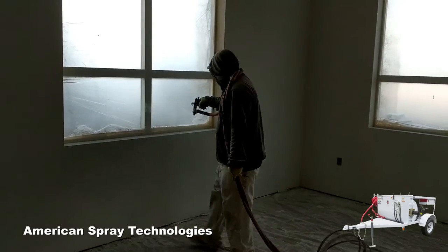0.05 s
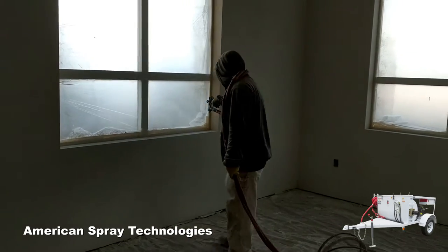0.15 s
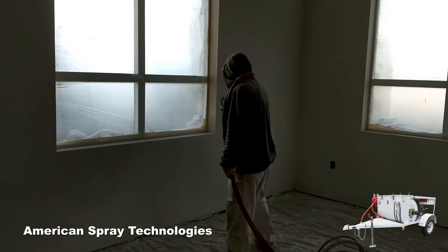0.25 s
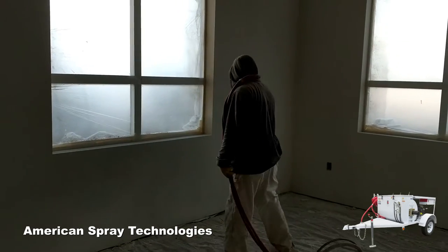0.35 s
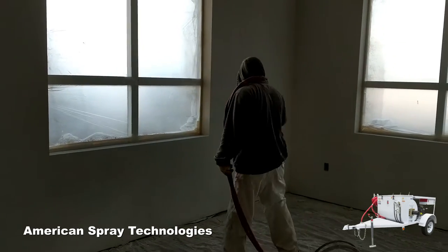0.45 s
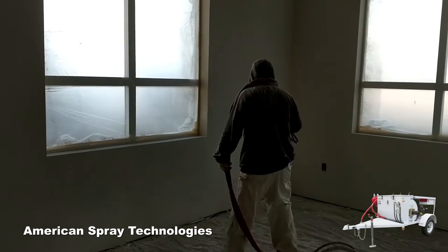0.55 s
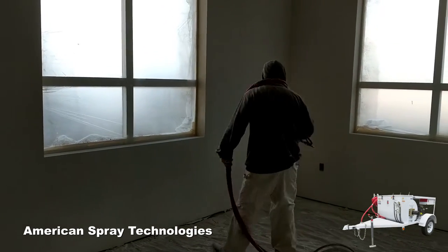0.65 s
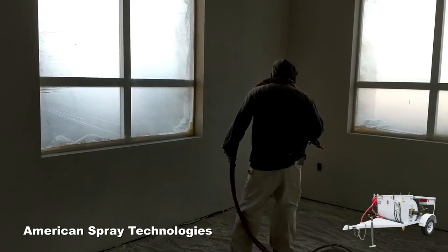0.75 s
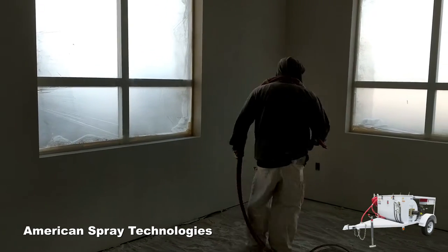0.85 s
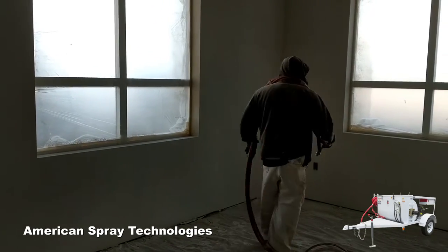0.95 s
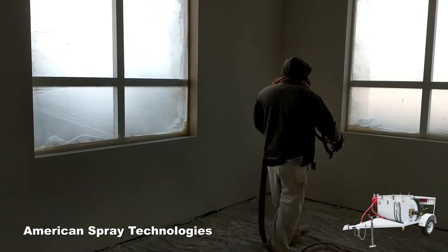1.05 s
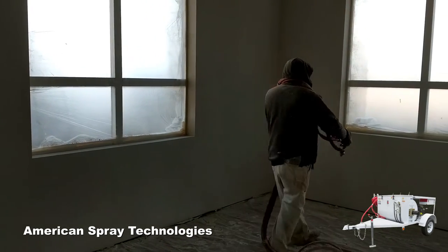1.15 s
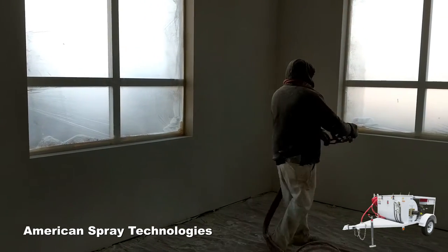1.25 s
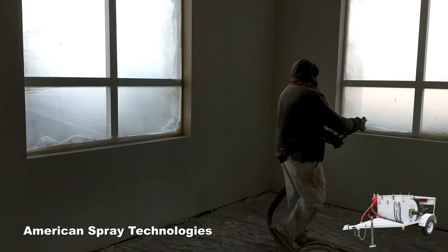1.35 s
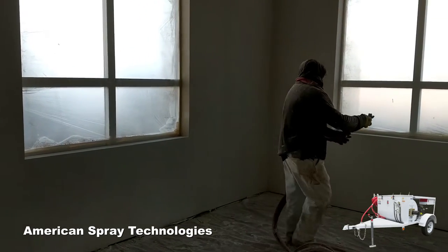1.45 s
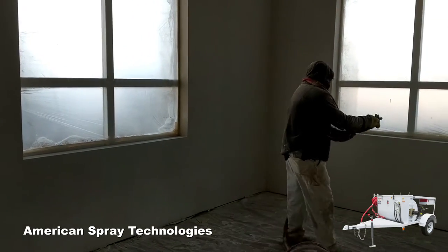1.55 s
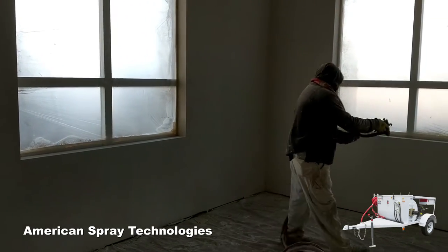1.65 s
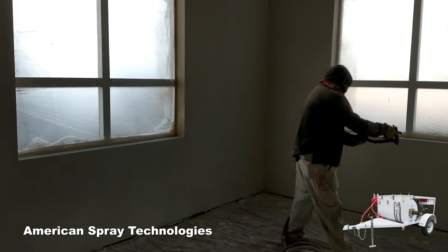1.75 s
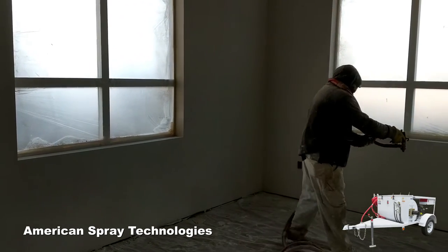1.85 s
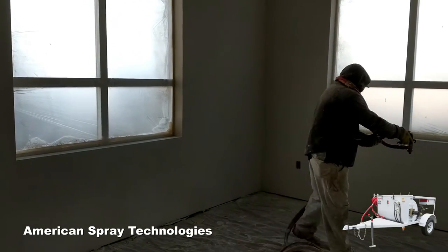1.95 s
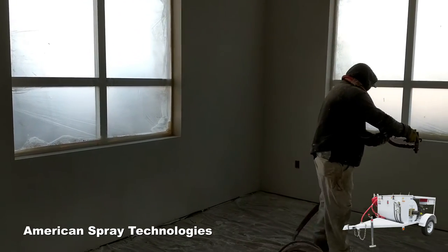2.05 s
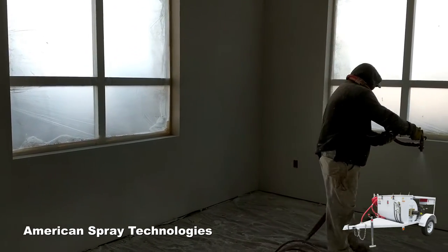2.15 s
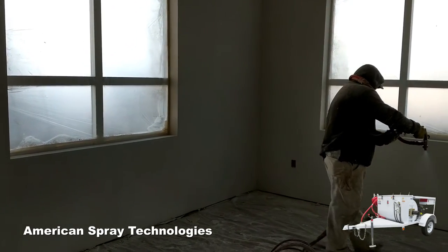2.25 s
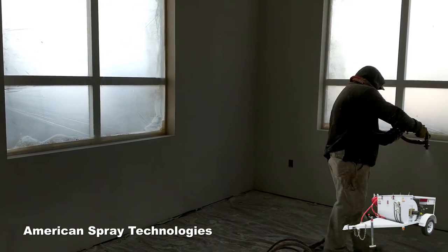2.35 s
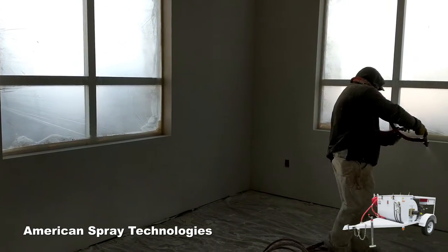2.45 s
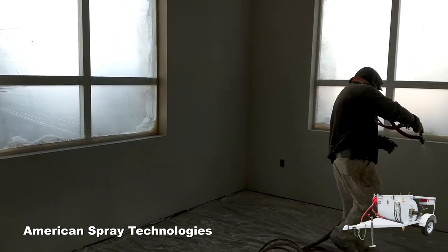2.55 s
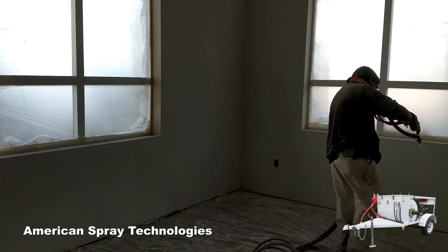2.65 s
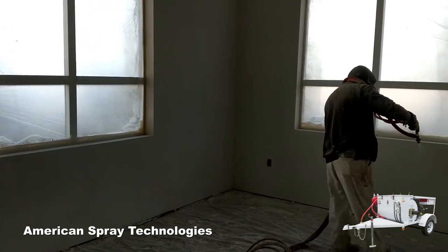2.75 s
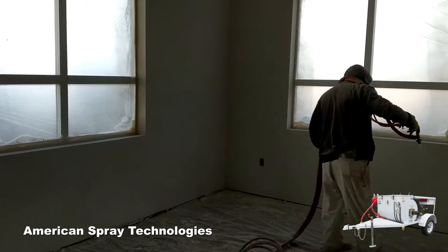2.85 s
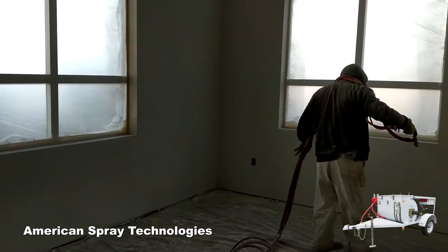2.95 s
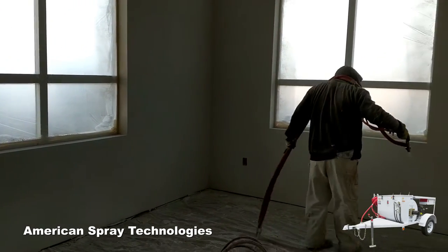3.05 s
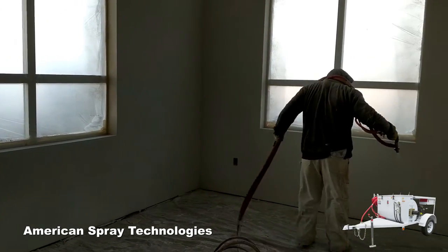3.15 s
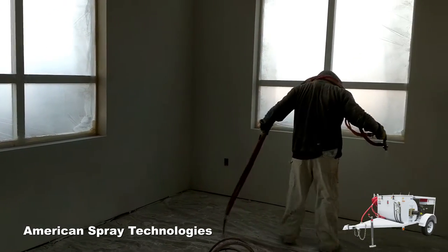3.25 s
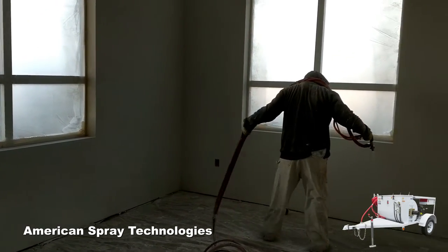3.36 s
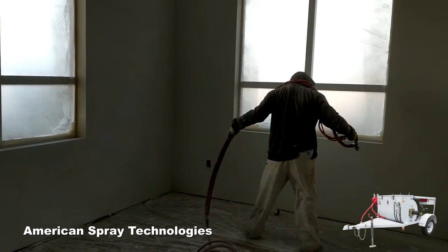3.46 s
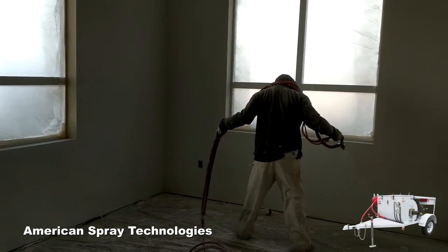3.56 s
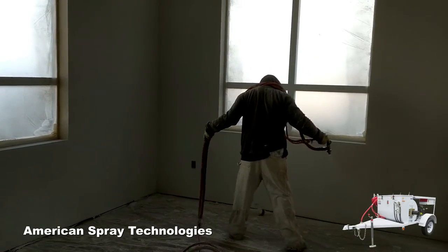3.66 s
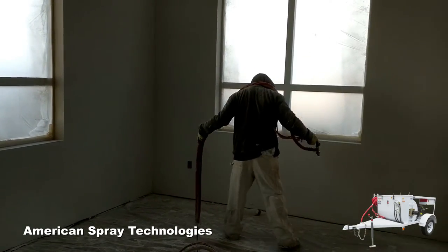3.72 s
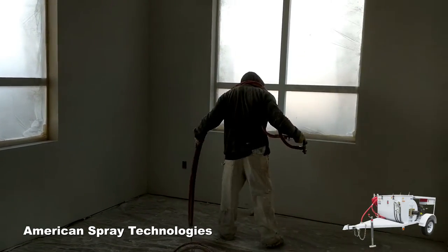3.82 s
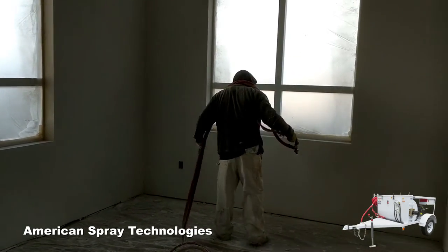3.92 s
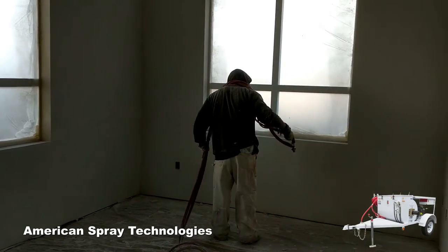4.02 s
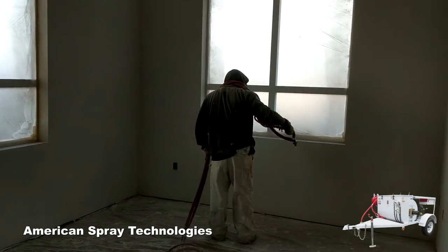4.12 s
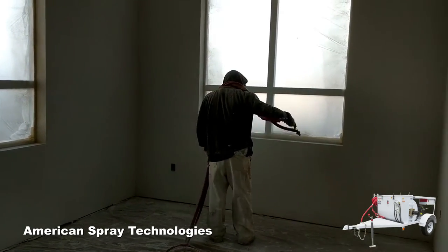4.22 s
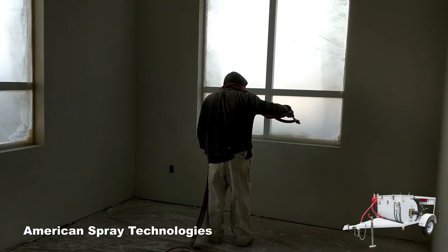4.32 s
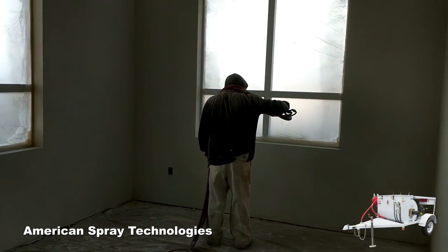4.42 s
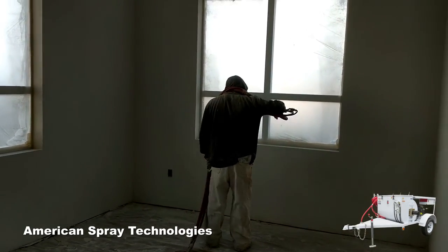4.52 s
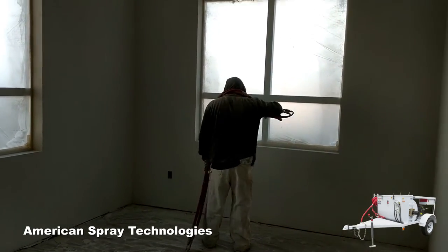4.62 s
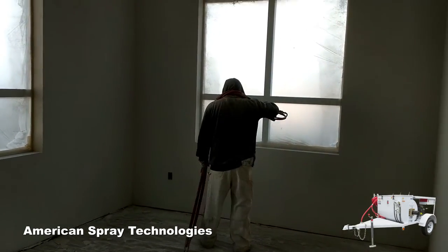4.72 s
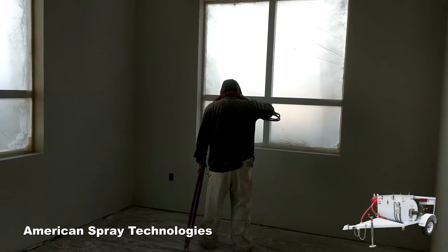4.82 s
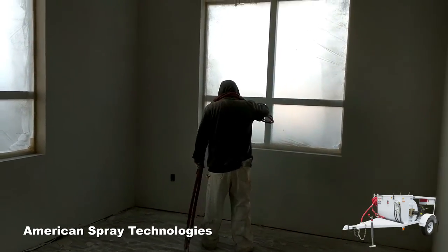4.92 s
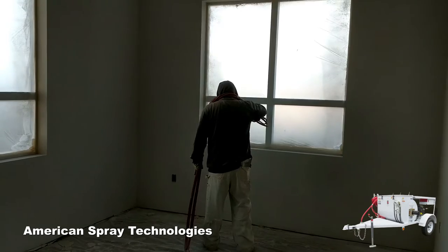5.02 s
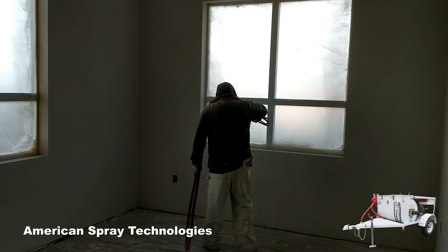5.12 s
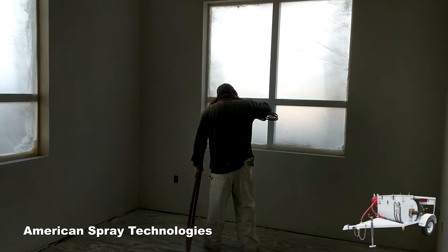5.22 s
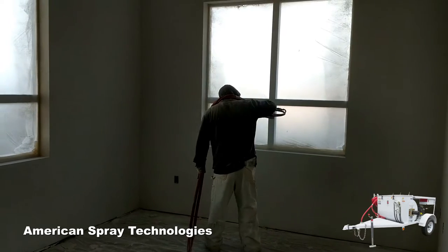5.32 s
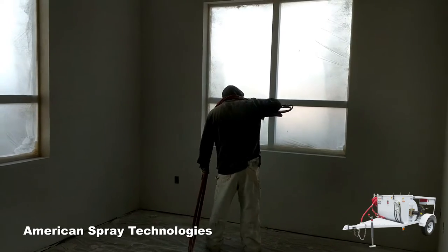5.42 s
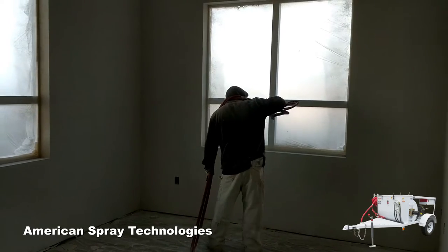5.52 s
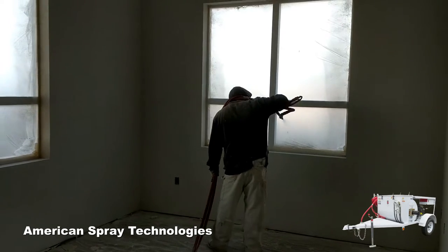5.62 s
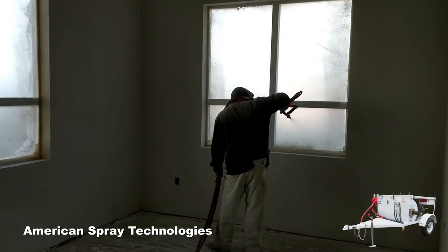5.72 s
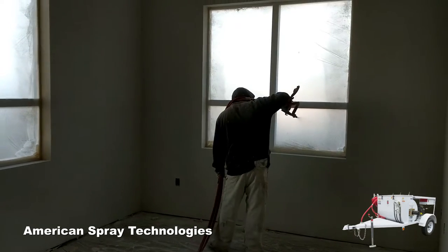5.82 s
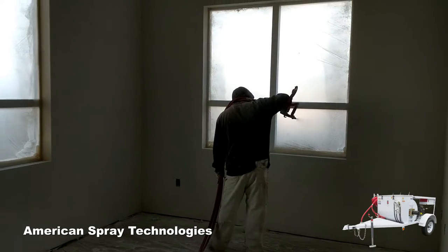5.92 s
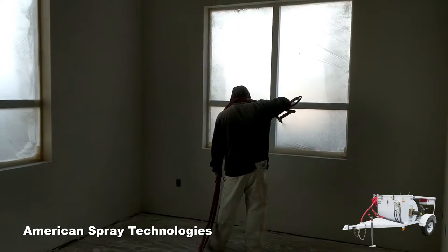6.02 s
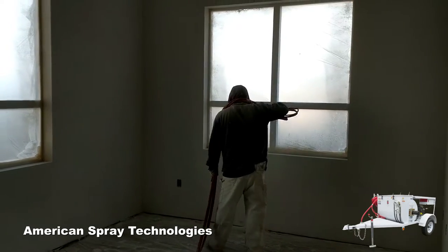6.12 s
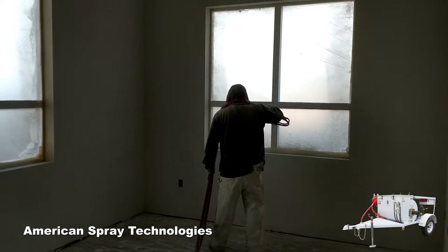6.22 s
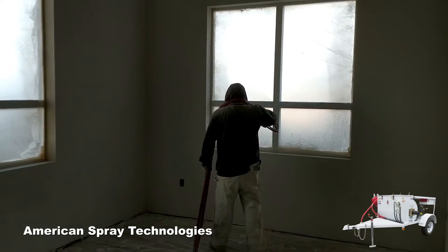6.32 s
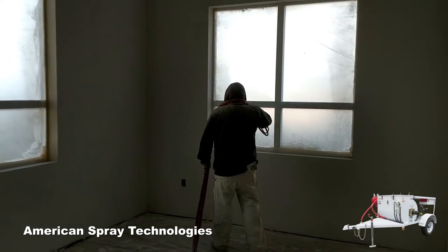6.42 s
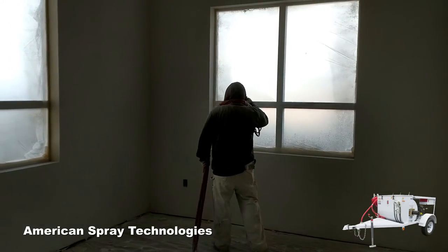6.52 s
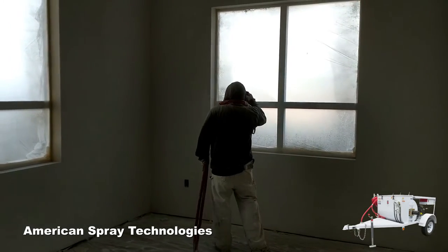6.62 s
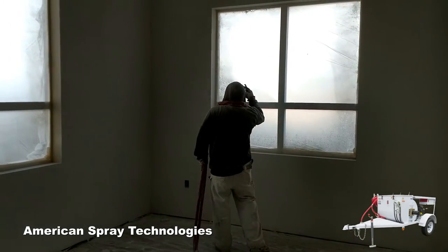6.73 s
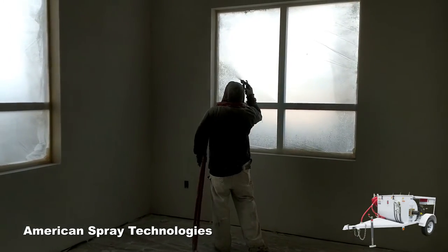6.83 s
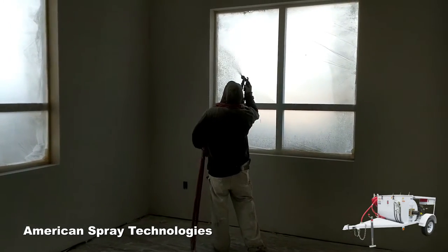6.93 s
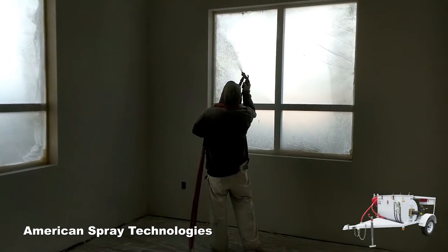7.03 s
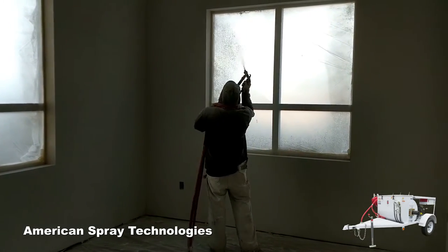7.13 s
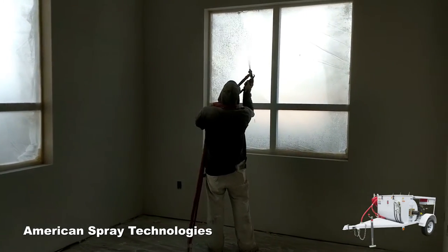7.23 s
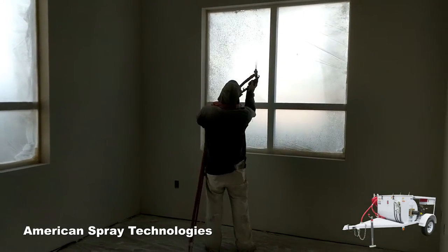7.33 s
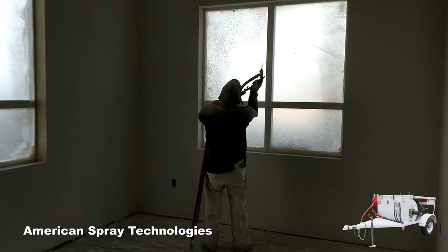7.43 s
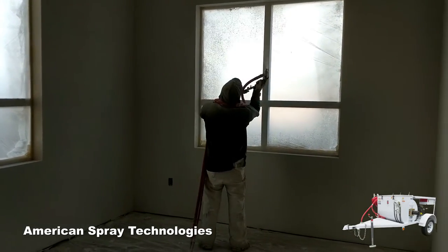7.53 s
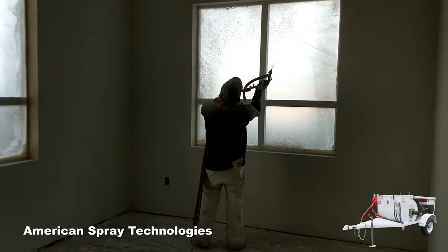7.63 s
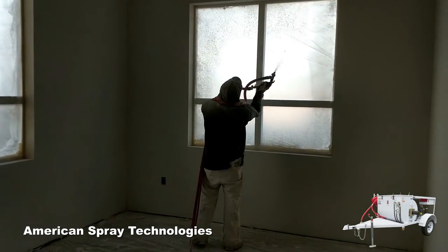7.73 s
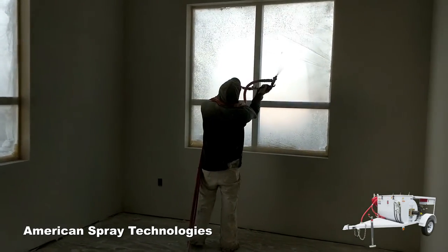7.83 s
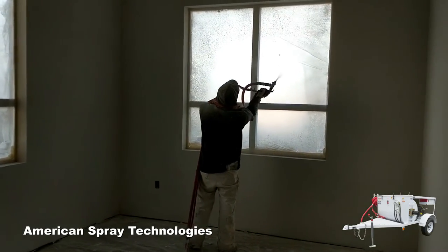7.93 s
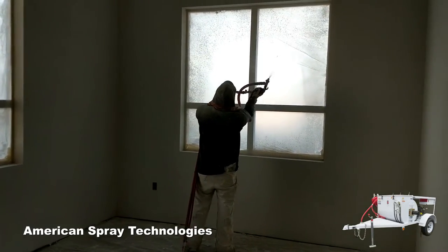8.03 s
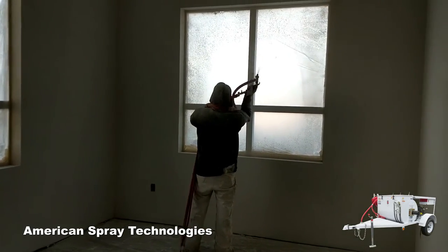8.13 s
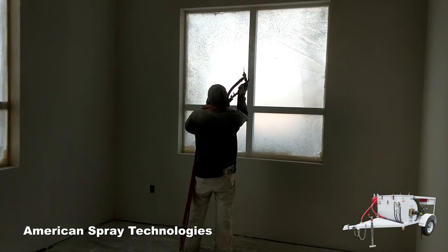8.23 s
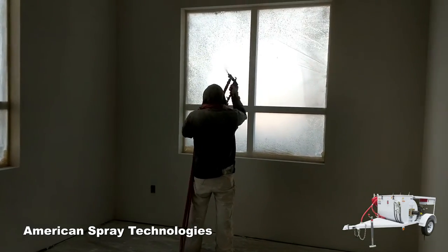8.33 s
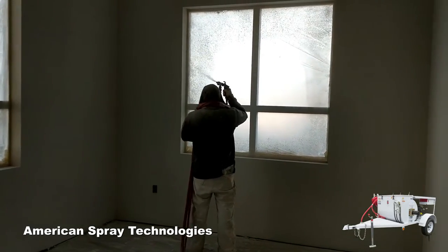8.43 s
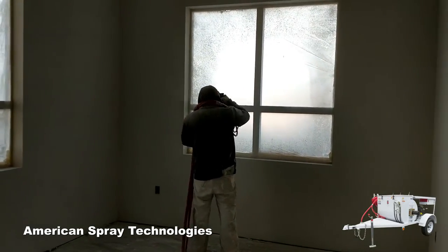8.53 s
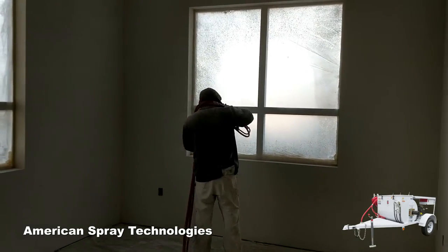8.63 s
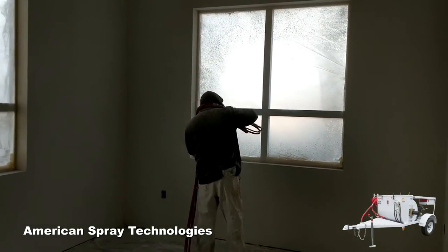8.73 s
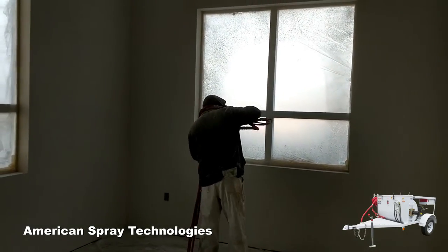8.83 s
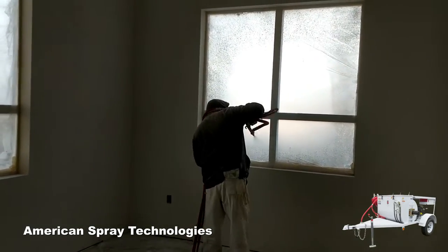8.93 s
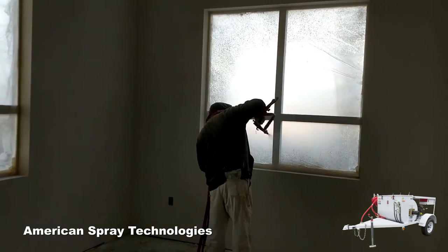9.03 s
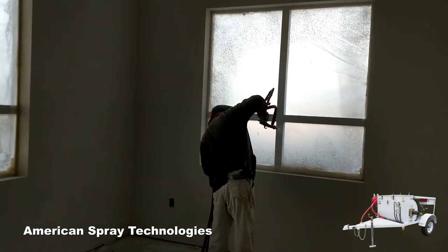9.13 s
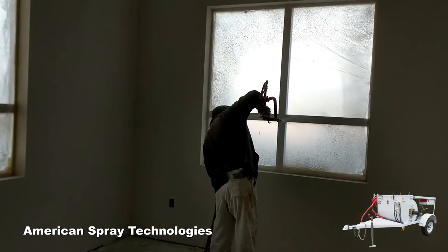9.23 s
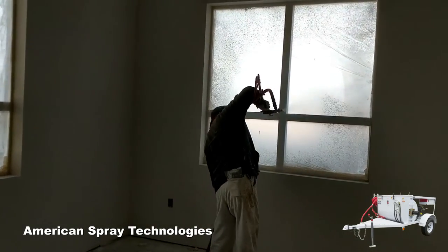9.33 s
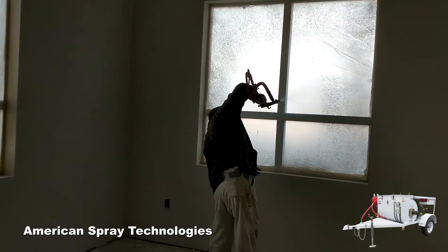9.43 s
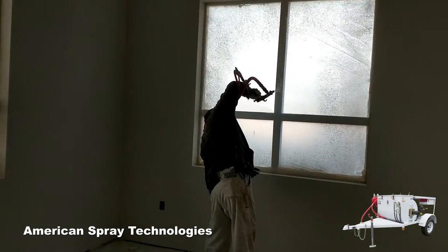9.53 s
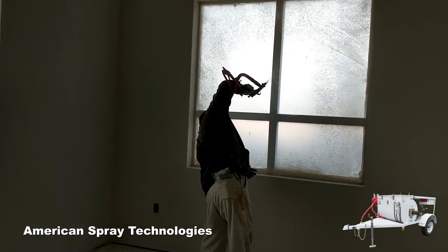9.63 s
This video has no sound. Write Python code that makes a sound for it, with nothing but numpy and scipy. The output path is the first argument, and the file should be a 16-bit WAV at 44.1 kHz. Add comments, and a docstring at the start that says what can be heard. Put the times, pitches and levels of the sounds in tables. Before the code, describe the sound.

A spray gun hisses in a bare room, stops briefly for foot scuffs and a faint engine drone, then sprays again steadily.

```python
"""Texture gun in a bare room

A hose-fed gun hisses as its air jet tears wet slurry into drops, and the hard walls echo. The jet
stops, boots and hose scuff the floor while an engine drones outside, then the trigger opens again.
Draughts thump on the two microphone ports (sound holes) of a small camera, whose stereo widener
subtracts a delayed copy of each port from the other."""
import sys
import numpy as np
from scipy import signal
from scipy.fft import rfft, irfft, next_fast_len
from scipy.io import wavfile
from scipy.ndimage import uniform_filter1d, map_coordinates

SR = 44100
rng = np.random.default_rng(int(sys.argv[2]) if len(sys.argv) > 2 else 0)


def inscribe(sig):
    """Save sig as 16-bit PCM at rate SR to the path in sys.argv[1].

    A 1-D sig is mono; a 2-D sig holds one channel per row.
    Samples are clipped to [-1, 1] before scaling.
    """
    pcm = np.round(np.clip(np.atleast_2d(sig).T, -1, 1) * 32767)
    wavfile.write(sys.argv[1], SR, pcm.astype(np.int16))


N = 426447

# pulls of the trigger: opens t/s, shuts t/s
TRIGGER_PULLS = [(0, 0.35), (2.027, 9.67)]
# strength of the open jet: t/s, hiss level/dB, spatter over hiss/dB
JET_LEVELS = [(0, -30.5, -17.5), (0.34, -32.5, -18.5), (2.028, -31.5, -35), (2.106, -30, -17),
              (2.13, -22.5, -15), (2.2, -20.5, -18), (2.5, -25, -12.5), (2.77, -26, -10.5),
              (2.92, -25, -11), (3.24, -23.5, -12), (3.34, -27, -10), (3.48, -23, -9.5),
              (3.55, -26.5, -8.5), (3.66, -22.5, -12.5), (3.76, -27.5, -10.5), (4.11, -25.5, -12.5),
              (4.57, -25, -13), (4.79, -24.5, -12.5), (4.9, -26.5, -11), (5.04, -22.5, -14.5),
              (5.14, -25.5, -13.5), (5.37, -22.5, -14), (5.45, -24.5, -13), (5.65, -22, -15.5),
              (5.85, -23.5, -14.5), (5.96, -21.5, -16.5), (6.12, -23.5, -14.5), (7, -22, -15),
              (8.3, -21, -15.5), (8.45, -23.5, -15), (8.87, -22.5, -16), (9.34, -22, -13.5),
              (9.67, -21, -17)]
# roar of the jet once it carries slurry: t/s, level/dB
ROAR_LEVELS = [(2.13, -25.5), (2.22, -24.5), (2.55, -27), (2.8, -30), (2.93, -26.5), (3.05, -28.5),
               (3.48, -26.5), (3.56, -29), (3.66, -26), (3.8, -28), (4.15, -27), (4.5, -27.5),
               (4.88, -29.5), (5.04, -25), (5.18, -27.5), (5.36, -24.5), (5.5, -27.5), (5.65, -25.5),
               (6.05, -26.5), (6.3, -25.5), (7, -25), (7.63, -24.5), (7.78, -25), (7.92, -24.5),
               (8.35, -26), (8.45, -26), (8.55, -26.5), (9, -26), (9.67, -25.5)]
# tone colours of the jet's four sounds: f/Hz, level/dB
HISS_SPECTRUM = [(3500, -34), (4600, -1), (5500, -0.5), (6500, 3), (8000, 2), (9000, -0.5), (10500, -21.5)]
SPATTER_SPECTRUM = [(150, -28), (400, -14.5), (800, -6.5), (1300, -3), (1900, 2), (2500, -5.5), (3200, -14)]
ROAR_SPECTRUM = [(1200, -47), (1900, -13.5), (2200, -24.5), (2500, -3), (3000, -0.5), (3350, 3), (3700, 2),
                 (4000, 3), (4400, 0), (5200, -22.5)]
SIZZLE_SPECTRUM = [(7500, -31), (9300, -3.5), (10500, -0.5), (13000, -3), (16000, -1.5)]

# boots and hose dragged over the dusty floor: t/s, level/dB, drag time/s, rise/(dB per s)
FLOOR_SCUFFS = [(1.0, -55, 0.005, 500), (1.064, -49, 0.012, 400), (1.35, -46, 0.0062, 218),
                (1.554, -45, 0.063, 250), (1.79, -40.5, 0.033, 151), (1.89, -53, 0.01, 400)]
# faint shuffling between the scuffs: t/s, level/dB
SHUFFLE_LEVELS = [(0.45, -60), (0.75, -61.5), (1.0, -59), (1.5, -65), (2.02, -51)]
# tone colour of crushed grit: f/Hz, level/dB
GRIT_SPECTRUM = [(300, -22), (700, -7.5), (1400, -10), (2300, -11), (2800, -4), (3300, -1.5), (4000, -3.5),
                 (5200, -6), (7500, -5), (10000, -9.5), (16000, -14)]
# a hose fitting taps the floor and bounces: t/s, level/dB
FITTING_TAPS = [(1.7735, -32), (1.782, -33)]
# notes the fitting rings with: f/Hz, level/dB, time to fade by 60 dB/s
FITTING_NOTES = [(3100, 0, 0.025), (3550, -3, 0.02), (4900, -6, 0.02), (5600, -4, 0.025),
                 (7600, -10, 0.012)]

# the engine is heard louder in the pause and fainter under the jet: t/s, drone level/dB, growl over drone/dB
ENGINE_LEVELS = [(0, -56, -12), (.6, -57, -15), (.8, -55.5, -7.5), (1.4, -47.5, -12), (1.65, -45.5, -8),
                 (1.8, -44.5, -6), (1.86, -52, -2), (1.93, -49, -4), (2.02, -49.5, -6), (2.08, -66, -10),
                 (2.9, -70, 0), (3.1, -67, -2), (4.5, -69, 2), (4.8, -59, -6), (5.4, -61, 1),
                 (5.7, -68, -3), (6.5, -64, -6), (7, -66, -8), (9.67, -65, 3)]
# how often the engine fires, with one brief rev: t/s, f/Hz
FIRING_RATE = [(0, 24.1), (1.72, 24.12), (1.85, 25), (2.05, 25), (2.6, 24.15), (9.67, 24.15)]
# a doorway resonance that sweeps upward as the engine revs: t/s, f/Hz, boost/dB
DOORWAY_SWEEP = [(1.4, 210, 2), (1.55, 220, 5), (1.72, 287, 11), (1.85, 330, 0), (2.02, 352, 7),
                 (2.08, 350, 0)]
# the engine's low (drone) and higher (growl) tones: multiple of the firing rate, level/dB
DRONE_TONES = [(3, -16), (4, -13), (5, -1.5), (6, 3.5), (8, -14), (9, -15), (10, -13)]
GROWL_TONES = [(11, -9), (12, -4), (13, -6.5), (14, -2), (15, -14), (17, -9), (19, -8), (20, -7), (22, -9),
               (24, -7.5), (25, -10), (27.5, -8), (35, -11), (44, -8.5)]
# tone colour of the engine's clatter: f/Hz, level/dB
CLATTER_SPECTRUM = [(40, -15), (120, -2), (300, -9.5), (700, -12), (1200, -13.5), (1800, -18.5),
                    (3200, -13), (6000, -29), (16000, -69)]

# gusts of draught at the ports: t/s, level/dB, hold time/s
DRAUGHT_GUSTS = [(2.194, -59, 0.028), (4.242, -56.5, 0.067), (5.62, -50, 0.12), (6.75, -52.5, 0.12),
                 (7.253, -51, 0.14), (7.948, -48, 0.072), (8.213, -52, 0.045), (8.997, -54, 0.083),
                 (9.3, -51.5, 0.35)]
# tone colour of their rumble: f/Hz, level/dB
RUMBLE_SPECTRUM = [(20, -18), (45, -2), (80, -3.5), (140, -3), (220, -1.5), (350, -14.5), (600, -32),
                   (900, -33)]
# pressure thumps on the ports: t/s, level/dB, sharp edge over thump/dB, extra lean to the left/dB
PORT_THUMPS = [(2.197, -27, -9, 36), (2.47, -43, -15, 12), (2.735, -44, -15, 12), (2.974, -37, -15, 12),
               (4.0, -42, -15, 12), (4.2, -39, -15, 12), (4.268, -38, -15, 6), (4.435, -35, -13, 12),
               (5.558, -21, -12, 30), (5.638, -26, -22, 24), (5.651, -34, -22, 12), (5.66, -33, -25, 12),
               (5.757, -35, -13, 12), (5.85, -41, -15, 12), (5.93, -44, -15, 12), (5.99, -39, -15, 12),
               (6.748, -30.5, -2, 30), (6.783, -29, -11.5, 12), (6.846, -36, -14.5, -6),
               (6.878, -36, -13, 36), (7.06, -41, -15, 12), (7.14, -43, -15, 12), (7.225, -27, -4, 20),
               (7.256, -30, -12, 37.5), (7.368, -31.5, -10, 1), (7.47, -39, -15, 12), (7.515, -39, -15, 12),
               (7.559, -34, -14, 36), (7.597, -34, -1, 12), (7.641, -33, -13, 6), (7.7, -38, -15, 12),
               (7.911, -36, -16, 0.5), (7.989, -36, -12, -14), (8.019, -34, -16, 3), (8.152, -39, -20, 12),
               (8.209, -26.5, -13, -8), (8.2385, -22, -8, 24), (8.2755, -22, -10, 18),
               (8.348, -40, -15, 12), (8.975, -38, -15, 12), (9.055, -38, -8, 12), (9.219, -34, -10, -8),
               (9.236, -34, -10, 6), (9.259, -27, -9, 16), (9.386, -32, -8, -20), (9.394, -31, -15, -18),
               (9.414, -33, -10, -8), (9.421, -33, -12, -8), (9.459, -31, -10, 3), (9.464, -32, -14, 5),
               (9.481, -39, -14, 5), (9.652, -33, -19, -2)]

# how long the room echoes: f/Hz, time to fade by 60 dB/s
ECHO_TIMES = [(200, 0.36), (1000, 0.36), (4000, 0.47), (9000, 0.54), (15000, 0.34)]
# how alike a noise is at the two ports: f/Hz, likeness (1 = the same)
PORT_LIKENESS = [(100, 0.8), (500, 0.77), (1500, 0.013), (4000, 0.022), (9000, .01)]
# how much of the other port the widener subtracts: f/Hz, gain
WIDENER_GAINS = [(50, 0.53), (130, 0.57), (1000, 0.29), (2200, 1), (3300, 0.81), (4400, 0.72), (5500, 0.65),
                 (6600, 0.43), (8500, 0.3), (11000, .01)]
# tone colour of the duller right side: f/Hz, level/dB
RIGHT_TONE = [(60, 2.5), (300, 4), (1000, -0.23), (5000, 0.5), (7000, -2.5), (8300, -8.5), (10000, -14),
              (11800, -19), (13500, -6.5), (15500, -5)]

SLURRY_S, LOAD_S = 2.106, 0.013  # air blows alone until the slurry arrives; time to fill the jet
AIR_ROAR_DB, AIR_SIZZLE_DB, WET_SIZZLE_DB = -8, 1, -3  # relative to a hiss of usual strength
USUAL_HISS_DB, SIZZLE_FOLLOWS = -23, 0.54  # the wet sizzle follows this share of the hiss's swings
LEAK_DB, LEAK_DB_PER_S, LEAK_MIX_DB = -41.5, 250, (2.5, 1.1, -9)  # mix: spatter, roar, sizzle over hiss
CLATTER_DB, CLATTER_FOLLOWS = -53, 0.85  # level with the drone at -50 dB; share of its swings followed
DOORWAY_WIDTH_HZ = 24
CALM_DB, FLICKS_PER_S, FLICK_DB = -63.5, 4, -3  # flicks are small random thumps that follow the gusts
MIC_HISS_DB, WIDENER_DELAY_MS = -73, 0.4623
LOW_CUT_HZ, TOP_HZ, TOP_EDGE_HZ = 25, 15530, 160


def texture_gun():
    """Air shears at the nozzle (roar, hiss, sizzle) and tears the slurry into drops (spatter)."""
    hiss = amp(-2.5) * rush(HISS_SPECTRUM, patchy_db=1.0, grain_db=0.75)
    spatter = amp(-2.0) * rush(SPATTER_SPECTRUM, patchy_db=1.5, grain_db=1.5)
    roar = amp(-3) * rush(ROAR_SPECTRUM, patchy_db=0.7, grain_db=1.2)
    sizzle = amp(5.0) * rush(SIZZLE_SPECTRUM, patchy_db=1.15, grain_db=0.5)
    t = np.arange(N) / SR
    trigger = sum(gate(opens, shuts, fade_s=0.0027) for opens, shuts in TRIGGER_PULLS)
    hiss_db, spatter_db = curves(JET_LEVELS)
    load = np.clip((t - SLURRY_S) / LOAD_S, 0, 1)  # 0 = air alone, 1 = full of slurry
    roar_db = AIR_ROAR_DB + load * (curves(ROAR_LEVELS)[0] - hiss_db - AIR_ROAR_DB)
    wet_sizzle_db = WET_SIZZLE_DB + (SIZZLE_FOLLOWS - 1) * (hiss_db - USUAL_HISS_DB)
    sizzle_db = AIR_SIZZLE_DB + load * (wet_sizzle_db - AIR_SIZZLE_DB)
    surge_db = 0.45 * wobble(20)  # slurry arrives in lumps
    jet = hiss + amp(spatter_db + 0.49 * wobble(8.1)) * spatter
    jet += amp(roar_db + 0.46 * wobble(14)) * roar + amp(sizzle_db) * sizzle
    # the valve leaks ever louder just before the second pull
    leak_db = LEAK_DB - LEAK_DB_PER_S * abs(t - TRIGGER_PULLS[1][0])
    leak = hiss + np.tensordot(amp(LEAK_MIX_DB), [spatter, roar, sizzle], 1)
    return trigger * amp(hiss_db + surge_db) * jet + amp(leak_db) * leak


def boots_and_hose():
    """Grit is crushed and dragged under soles and hose; a fitting rings as it taps the floor."""
    shuffle_db, = curves(SHUFFLE_LEVELS)
    shuffle = amp(shuffle_db) * gate(SHUFFLE_LEVELS[0][0], SHUFFLE_LEVELS[-1][0], fade_s=0.085)
    drag = shuffle + sum(swell(*scuff, fall_db_per_s=164) for scuff in FLOOR_SCUFFS)
    taps = np.zeros((2, N))
    t = np.arange(SR // 20) / SR
    for start, db in FITTING_TAPS:
        ring = sum(amp(level + rng.normal(0, 1.5, (2, 1)) - 60 * t / fade_s) * np.sin(2 * np.pi * hz * t)
                   for hz, level, fade_s in FITTING_NOTES)
        add_at(taps, start, amp(db) * ring * (1 - np.exp(-t / 0.0008)))
    return drag * amp(0.74 * wobble(29.6)) * rush(GRIT_SPECTRUM, patchy_db=1.2, grain_db=1.5) + taps


def engine():
    """Slightly unsteady firings make a stack of tones, and a clatter that throbs once per firing."""
    drone_db, growl_db = curves(ENGINE_LEVELS)
    firing_hz, = curves(FIRING_RATE)
    doorway_hz, boost_db = curves(DOORWAY_SWEEP)
    firing_phase = 2 * np.pi * np.cumsum(firing_hz * (1 + 0.001 * wobble(3))) / SR

    def tones(table, right_lag_rad, waver_db, wander_rad):
        """Sines at multiples of the firing rate; a wandering phase blurs the higher ones most."""
        total = np.zeros((2, N))
        for multiple, db in table:
            nearness = np.exp(-((multiple * firing_hz - doorway_hz) / DOORWAY_WIDTH_HZ) ** 2)
            gain = amp(db + boost_db * nearness + waver_db * wobble(15))
            phase = multiple * (firing_phase + wander_rad * wobble(30)) + rng.uniform(0, 2 * np.pi)
            total += gain * np.sin([phase, phase - right_lag_rad])
        return total

    drone = tones(DRONE_TONES, right_lag_rad=0.1, waver_db=0.9, wander_rad=0.005)
    growl = tones(GROWL_TONES, right_lag_rad=0.83, waver_db=3.5, wander_rad=0.013)
    clatter_db = CLATTER_DB + CLATTER_FOLLOWS * (drone_db + 50)
    throb_db = 0.78 * np.cos(firing_phase)
    clatter = amp(clatter_db + throb_db) * rush(CLATTER_SPECTRUM, patchy_db=0.5, grain_db=0.5)
    return amp(drone_db) * (drone + amp(growl_db) * growl) + clatter


def draught():
    """Air moving over the ports makes a lumpy rumble, and sudden steps in pressure make thumps."""
    gust = amp(CALM_DB) + sum(swell(*row, rise_db_per_s=74, fall_db_per_s=67) for row in DRAUGHT_GUSTS)
    lumps = amp(6.1 * np.array([wobble(32), wobble(25)]))
    air = gust * unit(lumps * rush(RUMBLE_SPECTRUM, patchy_db=2.5, grain_db=-3.5, likeness=[(30, 0.31)]))
    eddies = rush([(30, 1.0), (120, 3.5), (400, -7.5), (1100, -10.0), (2000, -51)],
                  patchy_db=-1.5, grain_db=-1.0, likeness=[(30, 0.1)])
    flicks = []  # same columns as PORT_THUMPS
    for when, softness, dullness, side in rng.uniform(size=(200, 4))[:int(FLICKS_PER_S * N / SR)]:
        sample = when * (N - 1)
        db = 20 * np.log10(gust[int(sample)]) + FLICK_DB - 10 * softness
        flicks.append((sample / SR, db, -6 - 10 * dullness, 30 * side - 10))
    t = np.arange(SR // 10) / SR
    attack = 1 - np.exp(-t / 0.00027)
    chances = rng.standard_normal((300, 2))
    for (start, db, edge_db, lean_db), (push, pitch) in zip(PORT_THUMPS + flicks, chances):
        cycles = 80 * amp(1.2 * pitch) * t + 0.55 * (1 - np.exp(-t / 0.0015))  # slows as it dies
        swing = np.sin(2 * np.pi * cycles) * amp(-60 * t / 0.095)
        edge = amp(edge_db) * np.sin(2 * np.pi * 420 * amp(1.5 * pitch) * t) * amp(-60 * t / 0.024)
        balance = unit(amp([[lean_db / 2], [-lean_db / 2]]) * [[1], [0.25]])
        add_at(air, start, np.sign(push) * amp(db) * balance * (swing + edge) * attack)
        puff = eddies[:, round(start * SR):][:, :len(t)]  # swirling air trails each thump
        add_at(air, start, amp(db - 9.5 - 60 * t[:puff.shape[1]] / 0.11) * puff)
    return air


def room_echo(x):
    """Bare walls keep sound alive, each pitch fading at its own speed; the gun moves, so echoes vary."""
    hz, t, spectra = signal.stft(x, SR, nperseg=256)
    kept = amp(-120 * (t[1] - t[0]) / along(ECHO_TIMES, hz))  # share of energy left after one frame
    energy = np.stack([signal.lfilter([0, 1 - share], [1, -share], abs(spectra[:, band]) ** 2)
                       for band, share in enumerate(kept)], axis=1)
    noise = signal.stft(rng.standard_normal(x.shape), SR, nperseg=256)[2]
    noise /= np.sqrt(np.mean(abs(noise) ** 2))
    return signal.istft(noise * np.sqrt(energy), SR, nperseg=256)[1][:, :N]


def standing_waves(x, depth_db):
    """Reflections strengthen some pitches and cancel others; the pattern drifts as the gun moves."""
    spectra = signal.stft(x, nperseg=2048)[2]
    gain = amp(depth_db * patches(spectra.shape[1:], bands=2, frames=16))
    return signal.istft(spectra * unit(gain), nperseg=2048)[1][:, :N]


def rush(spectrum, patchy_db, grain_db, likeness=PORT_LIKENESS):
    """Stereo noise of rms 1 with a given tone colour, roughened by quick grains and slower patches."""
    grains = amp(grain_db * unit(uniform_filter1d(rng.standard_normal(N), size=40)))
    spectra = signal.stft(rng.standard_normal((2, N)) * grains, nperseg=512)[2]
    spectra *= amp(patchy_db * patches(spectra.shape[1:], bands=6, frames=12))
    pair = signal.istft(spectra, nperseg=512)[1][:, :N]

    def colour(hz):
        """Split the spectrum into a part the ports share (mid) and an opposite part (side)."""
        angle = np.arccos(np.clip(along(likeness, hz), -1, 1)) / 2
        return amp(along(spectrum, hz)) * [np.cos(angle), np.sin(angle)]

    mid, side = filtered(pair, colour)
    return unit(np.array([mid + side, mid - side]))


def patches(shape, bands, frames):
    """A random pattern of rms 1, smoothed over frequency bands and time frames."""
    pattern = uniform_filter1d(rng.standard_normal(shape), size=bands, axis=0)
    return unit(uniform_filter1d(pattern, size=frames, axis=1))


def wobble(rate_hz):
    """A smooth curve through rate_hz random values a second (40 at most)."""
    samples = np.arange(0, N + 64, 64)
    values = rng.standard_normal(int(N * 40 / SR) + 4)
    return np.interp(np.arange(N), samples, map_coordinates(values, [samples * min(rate_hz, 40) / SR]))


def swell(peak_s, db, hold_s, rise_db_per_s, fall_db_per_s):
    """A gain that climbs to db at peak_s, holds, then sinks."""
    t = np.arange(N) / SR - peak_s
    return amp(db - rise_db_per_s * np.maximum(-t, 0) - fall_db_per_s * np.maximum(t - hold_s, 0))


def gate(start_s, end_s, fade_s):
    """A gain of 1 from start to end, fading to 0 on either side."""
    t = np.arange(N) / SR
    return np.clip(np.minimum(t - start_s, end_s - t) / fade_s + 1, 0, 1)


def add_at(track, start_s, sound):
    """Mix a short stereo sound into a track."""
    part = track[:, round(start_s * SR):][:, :sound.shape[1]]
    part += sound[:, :part.shape[1]]


def filtered(x, response):
    """Scale and delay each frequency of x by the complex number response(hz)."""
    size = next_fast_len(N + SR // 2)
    return irfft(rfft(x, size) * response(np.fft.rfftfreq(size, 1 / SR)), size)[..., :N]


def curves(rows):
    """One value per sample for each table column after the time."""
    times, *columns = np.transpose(rows)
    return [np.interp(np.arange(N) / SR, times, column) for column in columns]


def along(points, hz):
    """Read a (frequency, value) table at hz, on a log frequency scale."""
    freqs, values = np.transpose(points)
    return np.interp(np.log(hz + 1), np.log(freqs + 1), values)


def amp(db):
    """Turn decibels into a gain."""
    return 10 ** (np.asarray(db) / 20)


def unit(x):
    """Scale x to an rms (average strength) of 1."""
    return x / np.sqrt(np.mean(x ** 2) + 1e-20)


def scene():
    """Jet and boots are heard directly and off the walls, over the engine and the draught."""
    jet, steps = texture_gun(), boots_and_hose()
    indoors = amp(1.0) * jet + amp(-0.5) * room_echo(jet + amp(-10.0) * steps)
    return standing_waves(indoors, depth_db=2.5) + steps + engine() + draught()


def record(dry):
    """The widener subtracts each port, late and dull, from the other; the right side loses treble."""
    ports = dry + amp(MIC_HISS_DB) * rng.standard_normal(dry.shape)
    delay = lambda hz: np.exp(-2j * np.pi * hz * WIDENER_DELAY_MS / 1000)
    late = filtered(ports[::-1], lambda hz: along(WIDENER_GAINS, hz) * delay(hz))
    top_cut = lambda hz: np.clip((TOP_HZ - hz) / TOP_EDGE_HZ + 0.5, 0, 1) ** 2
    bass_cut = lambda hz: 1j * hz / (LOW_CUT_HZ + 1j * hz)
    sides = lambda hz: np.array([np.ones_like(hz), amp(along(RIGHT_TONE, hz))])
    return filtered(ports - late, lambda hz: top_cut(hz) * bass_cut(hz) * sides(hz))


dry = scene()
out = record(dry)
inscribe(out)
```